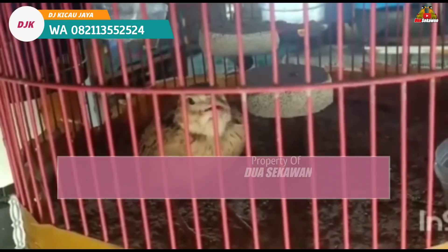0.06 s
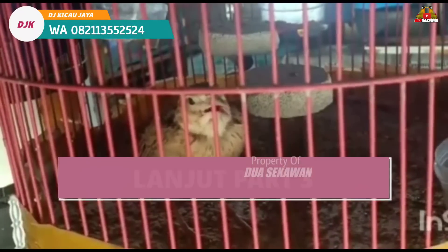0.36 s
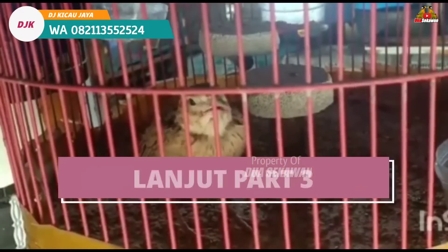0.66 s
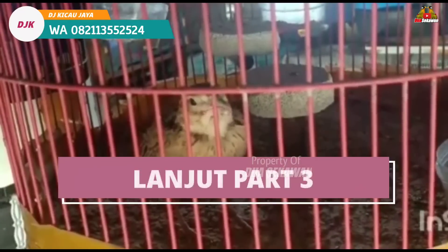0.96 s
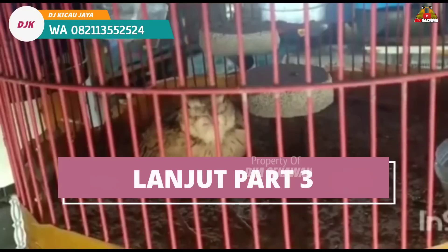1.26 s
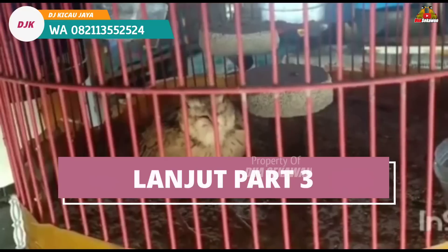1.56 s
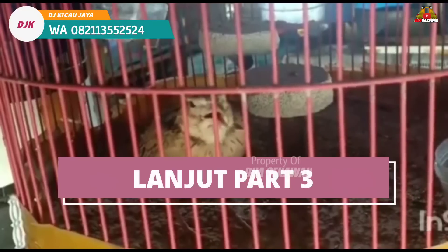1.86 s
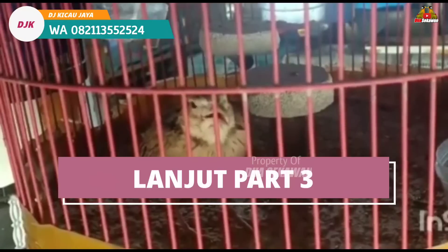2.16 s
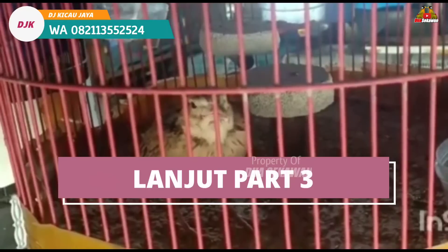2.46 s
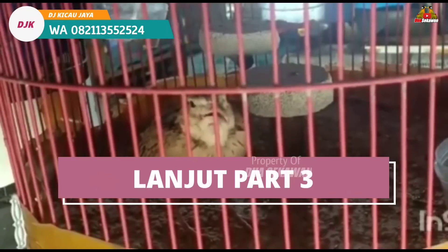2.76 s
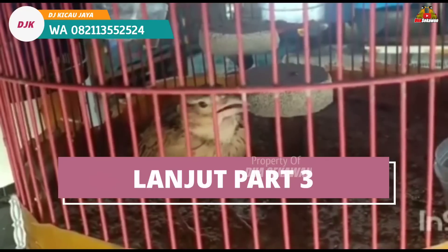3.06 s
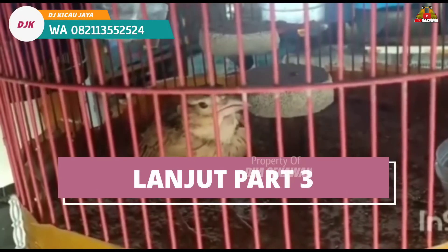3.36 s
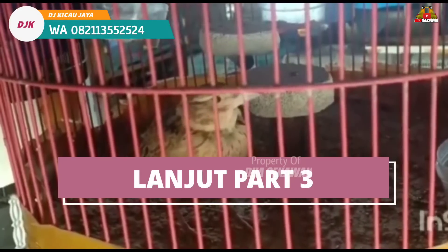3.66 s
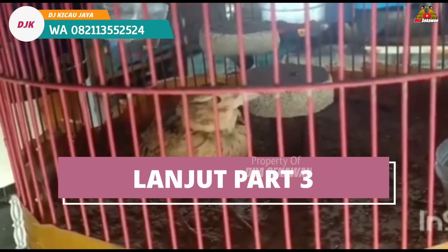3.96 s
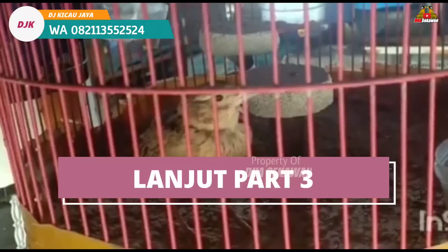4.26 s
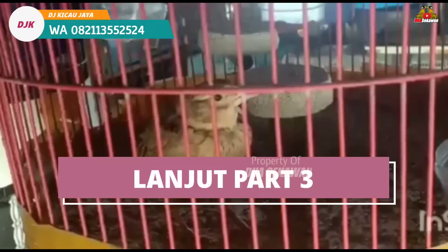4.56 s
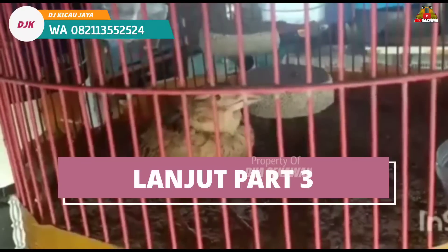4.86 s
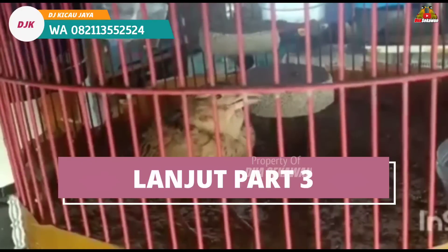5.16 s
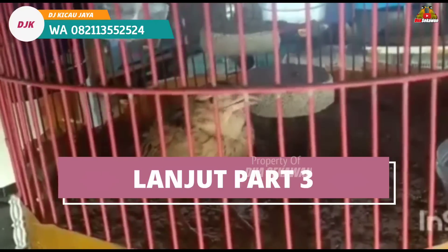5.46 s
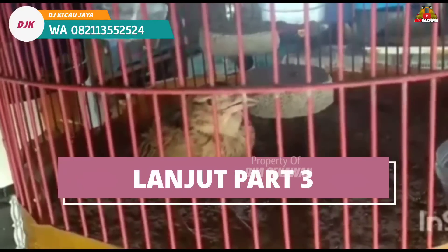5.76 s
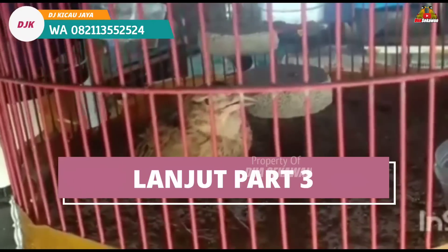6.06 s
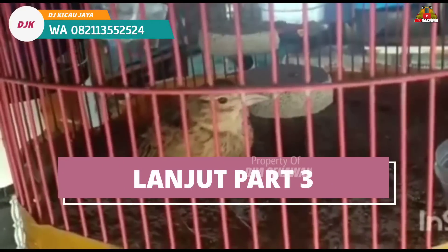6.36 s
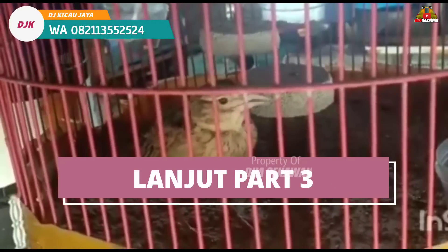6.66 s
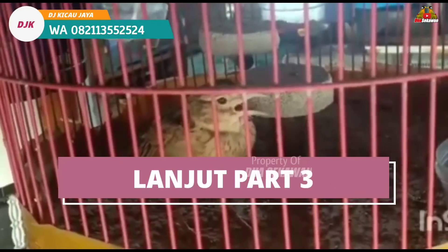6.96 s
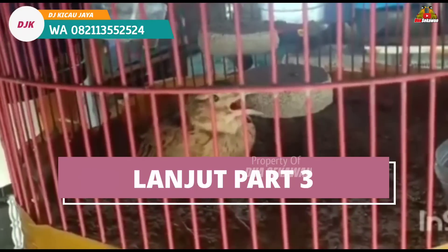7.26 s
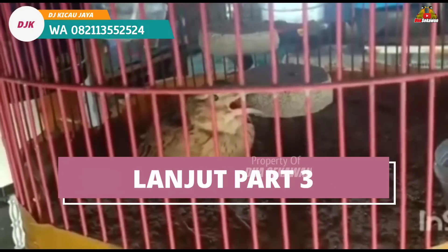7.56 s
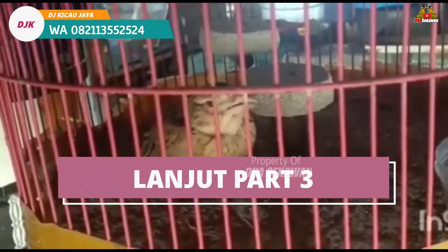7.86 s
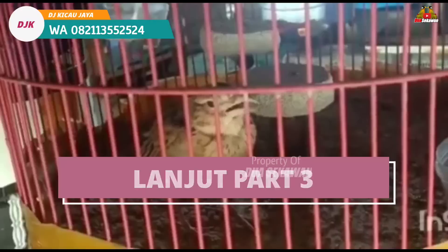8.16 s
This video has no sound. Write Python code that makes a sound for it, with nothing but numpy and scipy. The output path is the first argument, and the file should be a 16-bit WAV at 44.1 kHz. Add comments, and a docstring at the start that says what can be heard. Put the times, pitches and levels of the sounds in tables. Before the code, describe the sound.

High, overlapping birdsong runs throughout, heard near the cages in a small shop with short, fluttering echoes. A string of upward chirps comes first, then zigzag chatter, rapid trills, warbles and buzzing twitters. More distant calls and a soft, airy wash swell behind them. From the street come low rumble, tyre hiss and a quietly puttering motorbike, then a second one that slows and picks up again.

```python
"""Caged songbirds sing over one another in a small shop that is open to the street.
Each note is a gliding whistle from a bird's voice box, fluttered by echoes off walls and cages.
A faint airy rasp follows the song; behind it a soft, high wash with faint chirps swells and fades.
Outside, over rumble and tyre hiss, exhaust puffs ring in the pipes of two motorbikes:
one putters steadily while the other rolls past, slowing and picking up again."""
import sys
import numpy as np
from scipy import signal
from scipy.fft import rfft, irfft, next_fast_len
from scipy.io import wavfile
from scipy.ndimage import uniform_filter1d, minimum_filter1d

SR = 44100
rng = np.random.default_rng(int(sys.argv[2]) if len(sys.argv) > 2 else 0)


def pcm_store(signal):
    """Save signal as 16-bit PCM."""
    levels = np.round(np.clip(np.atleast_2d(signal), -1, 1) * 32767)
    wavfile.write(sys.argv[1], SR, levels.astype(np.int16).T)


N = 361619
TIME = np.arange(N) / SR


def from_db(db):
    """Turn decibels into a gain. Levels in the tables are relative: later gains add to them."""
    return 10 ** (np.asarray(db) / 20)


def rms_one(x):
    """Scale a sound so that its average power is 1."""
    return x / np.sqrt(np.mean(x ** 2) + 1e-20)


def curves(rows, at):
    """Read a table between its rows along straight lines, looking up by the first column."""
    first, *columns = np.transpose(rows)
    return [np.interp(at, first, column) for column in columns]


def drift(count, per_s):
    """A random wobble, about 1 in size, that heads for a new value per_s times a second."""
    targets = rng.standard_normal(int(count * per_s / SR) + 2)
    return np.interp(np.arange(count) * per_s / SR, np.arange(len(targets)), targets)


def delayed(x, delay_s):
    """The same sound, a little later."""
    return np.interp(TIME - delay_s, TIME, x, left=0)


def add(out, start_s, sound):
    """Mix a sound in at its start time."""
    start = round(start_s * SR)
    part = sound[max(-start, 0):N - start]
    out[max(start, 0):max(start, 0) + len(part)] += part


def through(length_s):
    """How much of a note has passed at each sample, from 0 to 1."""
    return np.linspace(0, 1, max(int(length_s * SR), 64))


def noise(spectrum):
    """Stereo noise with a given tone colour; the two ears are most alike in the bass."""
    # how alike left and right are: frequency_hz, likeness_share
    ear_likeness = [(60, 0.95), (200, 0.72), (500, 0.67), (1000, 0.0035), (4000, 0.43), (16000, 0.38)]
    size = next_fast_len(N)
    log_hz = np.log(np.arange(size // 2 + 1) * SR / size + 1)
    hz, db = np.transpose(spectrum)
    past_ends = np.abs(log_hz - np.clip(log_hz, np.log(hz[0]), np.log(hz[-1])))
    gain = from_db(np.interp(log_hz, np.log(hz), db) - 40 * past_ends)
    alike = np.clip(curves(ear_likeness, np.exp(log_hz))[0], -1, 1)
    mid, side = rfft(rng.standard_normal((2, size)))
    ears = np.sqrt(1 + alike) * mid + np.sqrt(1 - alike) * side * [[1], [-1]]
    return rms_one(irfft(gain * ears, size)[:, :N])


def far_engine():
    """An engine further off: one wavering exhaust tone that climbs a little."""
    # the engine's note: time_s, pitch_hz, level_db
    engine_note = [(4.6, 349, -70), (4.95, 344.3, -33.5), (5.5, 353.5, -35), (5.75, 363.4, -34.5),
                   (6.1, 365, -65)]
    hz, db = curves(engine_note, TIME)
    hz *= 1 + .0089 * drift(N, 25)
    sounding = (TIME > engine_note[0][0]) & (TIME < engine_note[-1][0])
    return sounding * from_db(db) * np.sin(2 * np.pi * np.cumsum(hz) / SR)


def motorbike(ride, pipe, unevenness, roughness):
    """Each firing of the engine sends out a puff that rings in the exhaust pipe."""
    per_s, db = curves(ride, TIME)
    firings = np.cumsum(per_s * (1 + .003 * drift(N, 8))) / SR
    puffs = np.diff(np.floor(firings), prepend=0) * (1 + unevenness * drift(N, 40))
    puffs += roughness * rng.standard_normal(N) * np.exp(-4 * (firings % 1))
    out = np.zeros(N)
    for k, (hz, width_hz, ring_db) in enumerate(pipe):
        band = signal.butter(2, [hz - width_hz / 2, hz + width_hz / 2], "band", fs=SR, output="sos")
        out += (-1) ** k * from_db(ring_db) * signal.sosfilt(band, puffs)
    return from_db(db) * rms_one(out)


def street():
    """Two motorbikes and a far engine over rumble and tyre hiss, a little to the right."""
    # how each engine runs: time_s, firings_per_s, level_db
    steady_ride = [(0, 28.8, -58), (1.5, 29.3, -51), (2.9, 31.5, -41), (4.2, 32.4, -34), (5, 32.4, -35),
                   (6, 32, -39), (8.2, 32, -52)]
    passing_ride = [(0, 42, -62), (3.6, 43, -54), (5.7, 43.5, -37), (5.9, 42, -31), (6.1, 38, -26),
                    (6.5, 28.5, -27), (6.7, 26.7, -30), (6.9, 28, -27), (7.05, 32, -37), (7.7, 41, -41),
                    (8.2, 42, -52)]
    # where each exhaust pipe rings: pitch_hz, width_hz, level_db
    steady_pipe = [(119, 34, 3), (177.7, 51, 6.5), (264.7, 24, 0.5), (356, 77, -11.5)]
    passing_pipe = [(95.2, 25.5, 3), (141.4, 59, 0.5), (218.8, 105, -12.5), (365, 31, -18)]
    # tone colours of the road noise: frequency_hz, level_db
    rumble_colour = [(30, -24), (60, -0.5), (85, 7), (160, 2), (260, -3), (350, 1), (500, -30.5)]
    tyre_colour = [(200, 1), (400, 1), (700, -2), (1300, -7.5), (2500, -3.5), (5000, -28), (8000, -66),
                   (12000, -34), (16000, -41)]
    # how the traffic swells: time_s, rumble_db, tyre_db
    traffic_levels = [(0.0, -40, -55), (0.27, -44, -54), (3.22, -37.5, -45.5), (3.4, -41.5, -47),
                      (3.95, -33, -42.5), (5.64, -31, -38), (6.03, -26, -38), (6.83, -25.5, -33),
                      (7.1, -32, -44), (8.2, -32, -48.5)]
    steady = from_db(1.5) * motorbike(steady_ride, steady_pipe, unevenness=.14, roughness=.005)
    passing = from_db(3) * motorbike(passing_ride, passing_pipe, unevenness=.13, roughness=.006)
    rumble_db, tyre_db = curves(traffic_levels, TIME)
    road = from_db(rumble_db - 5.5) * noise(rumble_colour)
    road += from_db(tyre_db + 7.5) * noise(tyre_colour)
    return (steady + passing + far_engine() + road) * from_db([[-1.4], [1.4]])


def voice_box(hz, db, jitter, bright_db=0, hoarse=.62):
    """A bird's nearly pure whistle with faint, hoarse overtones; jitter shakes the pitch."""
    # tones above the main pitch: pitch_multiple, level_db
    overtones = [(2, -34), (3, -35.5)]
    hz = hz * (1 + jitter * drift(len(hz), 900.8))
    phase = 2 * np.pi * np.cumsum(hz) / SR
    tone = np.sin(phase)
    for multiple, overtone_db in overtones:
        overtone = np.sin(multiple * phase + hoarse * drift(len(hz), 1500))
        tone += from_db(overtone_db + bright_db) * overtone * (multiple * hz < SR / 2)
    age = np.arange(len(hz)) / SR
    soft_ends = np.clip(np.minimum(age, age[::-1]) / .00066, 0, 1)
    return tone * from_db(db) * soft_ends


def cage(song, pan_db, lag_ms, echo_db, room_db, wall_scale, tail_s):
    """Place a bird to the right: direct sound, wall echoes and a tail that drops 60 dB in tail_s."""
    # nearby echoes at each ear: base_delay_s (stretched by wall_scale), level_db
    left_echoes = [(.0023, -6.5), (.0056, -6.5), (.0094, -11), (.0151, -13)]
    right_echoes = [(.0031, -2.5), (.0068, -13), (0.0114, -17), (0.019, -23.5)]
    direct = np.array([delayed(song, lag_ms / 1000), song])
    echoes = np.array([sum(from_db(db) * delayed(song, delay * wall_scale) for delay, db in side)
                       for side in (left_echoes, right_echoes)])
    age = TIME[:SR // 2]
    tail = rng.standard_normal((2, len(age))) * from_db(-60 * age / tail_s) * np.clip(age / .014, 0, 1)
    tail /= np.sqrt(np.sum(tail ** 2, axis=1, keepdims=True))
    room = signal.fftconvolve(song[None], tail, axes=1)[:, :N]
    heard = direct + from_db(echo_db) * echoes + from_db(room_db) * room
    return heard * from_db([[-pan_db / 2], [pan_db / 2]])


def high_wash():
    """A soft, high wash of noise with faint random chirps, swelling and fading behind the song."""
    # tone colour of the wash: frequency_hz, level_db
    wash_colour = [(1200, -52), (2000, 8.5), (2700, 11.5), (3600, 1), (4900, 2), (6200, -2), (8000, -16.5)]
    # how the wash swells and fades: time_s, level_db
    wash_levels = [(0, -44), (1.15, -33), (1.5, -26), (2.7, -30.5), (3.17, -15), (3.68, -33), (4, -22),
                   (4.45, -29), (4.85, -17), (6.2, -25.5), (6.75, -15.5), (7.95, -34), (8.2, -36.5)]
    chirps = np.zeros(N)
    for when, span, pitch, slope, strength in rng.random((130, 5)):
        share = through(.0249 + .052 * span)
        hz = 2600 * 2.1 ** pitch * np.exp(.4 * (2 * slope - 1) * (share - .5))
        add(chirps, when * TIME[-1], np.sin(np.pi * share) * voice_box(hz, 14 * strength, jitter=.015))
    chirps = cage(rms_one(chirps), pan_db=1, lag_ms=.2, echo_db=3, room_db=-3, wall_scale=1.6, tail_s=.4)
    return from_db(curves(wash_levels, TIME)[0] - 13) * (noise(wash_colour) + .5 * chirps)


def rasp(birds):
    """Flickering airy noise that follows the song, most of all its high notes."""
    # tone colour of the rasp: frequency_hz, level_db
    rasp_colour = [(900, -10), (2000, 5.5), (4500, 8), (6500, 4), (8000, -4), (10000, -20), (12000, -6.5),
                   (13800, 3), (15500, -14)]
    treble = np.diff(birds, prepend=0)
    loudness = np.sqrt(np.abs(uniform_filter1d(treble ** 2, size=200, axis=1)))
    return from_db(-24.5 + 6 * drift(N, 80)) * loudness * noise(rasp_colour)


def repeat_call(shape, notes, jitter, buzz=0, buzz_hz=250, bright_db=0):
    """A bird repeats one learnt shape; a buzz can shake the pitch in each note's second half."""
    out = np.zeros(N)
    for start_s, length_s, pitch_factor, level_db in notes:
        share = through(length_s)
        hz, db = curves(shape, share)
        depth = buzz * np.clip(2 * share - 1, 0, 1) ** .5
        shake = 1 + depth * np.sin(2 * np.pi * buzz_hz * length_s * share)
        add(out, start_s, voice_box(hz * pitch_factor * shake, db + level_db, jitter, bright_db))
    return out


def far_calls():
    """Cages further off: glides that swell and fade, rising 'wheets' and quick falling 'zips'."""
    # single glides: start_s, length_s, first_hz, last_hz, level_db, jitter_share
    glides = [(0.491, 0.043, 4950, 4420, -24, .044), (0.895, 0.091, 4230, 4760, -32, 0.027),
              (1.214, 0.088, 4680, 3510, -30, 0.0096), (1.611, 0.059, 3300, 2930, -32.5, 0.011),
              (2.071, 0.057, 5000, 6100, -23.5, 0.014), (2.477, 0.074, 2806, 2780, -16, 0.038),
              (2.842, 0.024, 4600, 3760, -13.5, .041), (2.927, 0.09, 4690, 4530, -22.5, .088),
              (3.66, 0.031, 2790, 2630, -31, .007), (3.941, 0.056, 4300, 2895, -19.5, 0.13),
              (3.967, 0.057, 5810, 5620, -24.5, 0.015), (4.051, 0.048, 2750, 2056, -21, 0.064),
              (4.105, 0.054, 2553, 2418, -16, 0.01), (4.183, 0.038, 5260, 6140, -21, 0.014),
              (4.501, 0.087, 3174, 2300, -17, 0.08), (4.73, 0.062, 3750, 4780, -17.5, 0.083),
              (4.983, 0.11, 3194, 2450, -11.5, 0.067), (5.225, .12, 3910, 6290, -20, 0.1),
              (5.495, .089, 2966, 2715, -12.5, .048), (6.273, 0.041, 4360, 6200, -19.5, 0.032),
              (6.486, 0.015, 3630, 6000, -20.5, .018), (6.689, .055, 4390, 3670, -16.5, .087),
              (6.788, 0.077, 4750, 5190, -23, .052), (7.435, 0.092, 2550, 2676, -25.5, 0.0065)]
    # shape of each call: note_share, base_pitch_hz, level_db
    wheet_shape = [(0, 2140, -6.5), (.3, 2274, -0.5), (.7, 2560, 5.5), (1, 2765, -8.5)]
    zip_shape = [(0, 6200, -5), (.2, 5650, 0), (.7, 4600, -5.5), (1, 4120, -3)]
    # when each is sung: start_s, length_s, pitch_factor, level_db
    wheet_notes = [(2.276, 0.15, 1.04, -27), (5.09, 0.077, 1.03, -14.5), (5.7, .19, 1, -14),
                   (6.587, .11, 1.01, -13.5), (7.361, .08, .95, -23)]
    zip_notes = [(.71, 0.033, 0.81, -25), (2.639, .039, 0.81, -35.5), (2.74, .045, 0.91, -38),
                 (3.148, 0.028, 0.85, -15), (3.214, 0.056, 0.89, -20.5), (3.886, 0.026, 1.04, -18.5),
                 (4.098, .026, 1, -17.5), (4.491, 0.013, 0.87, -19.5), (6.205, 0.041, 0.99, -17.5),
                 (6.415, 0.033, 0.99, -16.5)]
    out = np.zeros(N)
    for start_s, length_s, first_hz, last_hz, level_db, jitter in glides:
        share = through(length_s)
        swell = np.clip(np.minimum(share, 1 - share) * 5, 0, 1) ** .7
        hz = first_hz * (last_hz / first_hz) ** share
        add(out, start_s, swell * voice_box(hz, level_db, jitter))
    out += repeat_call(wheet_shape, wheet_notes, jitter=.024)
    return out + repeat_call(zip_shape, zip_notes, jitter=.022)


def plain_calls():
    """Falling whistles and tiny arched peeps."""
    # shape of each call: note_share, base_pitch_hz, level_db
    fall_shape = [(0, 5510, -7), (.2, 4820, 0), (.45, 3950, -1), (.75, 3450, -10), (1, 3100, -33)]
    peep_shape = [(0, 2650, -2.5), (.25, 3260, -1.5), (.55, 3450, -9), (1, 3010, -7)]
    # when each is sung: start_s, length_s, pitch_factor, level_db
    fall_notes = [(2.437, .031, .76, -10), (4.301, .068, 0.95, -7.5), (4.911, .052, 0.87, -6.5)]
    peep_notes = [(5.935, .021, 1, -12.5), (6.109, 0.0193, 1, -8.5)]
    falls = repeat_call(fall_shape, fall_notes, jitter=.012)
    return falls + repeat_call(peep_shape, peep_notes, jitter=.009)


def chatter():
    """Notes whose pitch and loudness zigzag quickly."""
    # the zigzag: note_share, base_pitch_hz, level_db
    shape = [(0, 5300, -4), (.06, 3300, 4.5), (.11, 2300, -10), (.19, 5000, -21), (.26, 3000, 8.5),
             (.31, 2800, -16), (.42, 3700, 4.5), (.5, 3010, 2.5), (.64, 3700, 4), (.72, 2280, -14),
             (.8, 2960, 8), (.88, 2000, -12.5), (1, 2493, -15)]
    # when it is sung: start_s, length_s, pitch_factor, level_db
    notes = [(0.977, 0.086, 1.003, -11.5), (1.291, 0.082, 0.95, -10), (1.499, 0.084, 0.97, -10),
             (1.68, 0.08, 1, -9)]
    return from_db(-1.5) * repeat_call(shape, notes, jitter=.0194)


def scoops():
    """Notes that dip, then rise with a buzz, while the bird's second voice sounds below."""
    # shapes of the two voices: note_share, base_pitch_hz, level_db
    upper_shape = [(0, 4110, -4.5), (.2, 3598, 2), (.45, 3290, -4.5), (.65, 3826, -2.5), (.85, 5000, -0.5),
                   (1, 5930, -18)]
    lower_shape = [(0, 2290, -22), (.15, 1960, -15.5), (.4, 1650, -38), (1, 1586, -58)]
    # when both are sung: start_s, length_s, pitch_factor, level_db
    notes = [(1.878, 0.039, 0.92, -6.5), (1.981, 0.037, 0.96, -3.5), (2.093, 0.042, 1, -6.5),
             (2.203, 0.037, 0.95, -4), (2.32, 0.038, 0.96, -12)]
    upper = repeat_call(upper_shape, notes, jitter=.036, buzz=.11, buzz_hz=262.3, bright_db=4.5)
    lower = repeat_call(lower_shape, notes, jitter=.044)
    return from_db(1) * upper + from_db(-4.5) * lower


def trills():
    """Fast runs of down-and-up notes; over a run the pitch sags and the level grows or fades."""
    # the runs: first_s, last_s, note_count, length_s, top_hz, bottom_hz, end_hz,
    # downstroke_db, upstroke_db, sag_share, fade_db (negative grows louder)
    runs = [(2.885, 3.032, 7, .016, 3790, 2016, 2440, -11.5, -19, .02, -5),
            (3.077, 3.134, 3, .016, 3890, 2070, 2400, -.5, -10, .02, 3),
            (3.171, 3.52, 12, .0145, 3940, 2360, 3610, -3.5, -5, 0.138, 9),
            (6.131, 6.477, 13, .022, 3724, 2126, 2845, -14, -8.5, .12, 1.5)]
    turn_share, turn_db, edge_db = .449, -7, -16.5   # each note is softer at its turn and its ends
    out = np.zeros(N)
    for first_s, last_s, count, length_s, top_hz, bottom_hz, end_hz, down_db, up_db, sag, fade_db in runs:
        share = through(length_s)
        hz = np.interp(share, [0, turn_share, 1], [top_hz, bottom_hz, end_hz])
        db = np.interp(share, [0, turn_share / 3, turn_share, (1 + turn_share) / 2, 1],
                       [down_db + edge_db, down_db, up_db + turn_db, up_db, up_db + edge_db])
        for along in np.linspace(0, 1, round(count)):
            pitch_slip, level_slip = rng.standard_normal(2)
            note_hz = hz * (1 - sag * along + .0346 * pitch_slip)
            note_db = db - fade_db * along + 1.9 * level_slip
            add(out, first_s + (last_s - first_s) * along, voice_box(note_hz, note_db, jitter=.037))
    return from_db(.5) * out


def twitters():
    """Buzzes of quick, uneven sweeps, alone or in high-low pairs; the voice dips between sweeps."""
    # lone buzzes: start_s, length_s, centre_hz, base_sweep_hz, sweeps_per_s (negative falls), level_db
    lone_buzzes = [(1.286, .2, 5014, 950, -69.5, -26.5), (5.5, 0.2, 5115, 1066, -55, -24),
                   (6.885, 0.049, 5060, 900, -150, -14.5), (6.945, 0.058, 3205, 900, -190, -9.5),
                   (6.975, 0.054, 3784, 2460, -68.5, -10)]
    # a short high buzz, then a louder low one: start_s, high_s, low_s, low_sweeps_per_s, level_db
    pairs = [(7.032, 0.063, 0.097, 71, -7.5), (7.249, .04, 0.093, 58, -9), (7.431, .04, .082, -115, -7.5),
             (7.586, .032, 0.055, -120, -9), (7.74, .065, 0.2, -78, -11)]
    high_hz, low_hz, gap_s = 5510, 4950, .003
    out, buzzes = np.zeros(N), list(lone_buzzes)
    for start_s, high_s, low_s, per_s, db in pairs:
        buzzes.append((start_s, high_s, high_hz, 880, 110, db - 4.5))
        buzzes.append((start_s + high_s + gap_s, low_s - gap_s, low_hz, 987, per_s, db))
    for start_s, length_s, centre_hz, base_sweep_hz, per_s, db in buzzes:
        count = len(through(length_s))
        sweeps = np.cumsum(per_s * (1 + .45 * drift(count, 110))) / SR
        swing = 2 * (sweeps % 1) - 1   # -1 at the bottom of a sweep, 1 at the top
        dip = 1.17 * np.abs(drift(count, 60)) * np.minimum(swing, 0) ** 2
        depth = .85 + .4 * drift(count, 80)
        hz = centre_hz + base_sweep_hz / 2 * (depth * swing - .187 * swing ** 2 - dip)
        hz = uniform_filter1d(hz, size=30)
        level_db = db - 26.5 * swing ** 4 + 3 * drift(count, 85.7)
        add(out, start_s, voice_box(hz, level_db, jitter=.025, bright_db=4.5, hoarse=1.9))
    return out


def arch(length_s, from_hz, top_hz, to_hz):
    """A pitch that swings up and down again."""
    share = through(length_s)
    lift_hz = top_hz - (from_hz + to_hz) / 2
    return from_hz + (to_hz - from_hz) * share + lift_hz * np.sin(np.pi * share)


def warbles():
    """Two arches of pitch that thin out at the top, then a landing note that settles and fades."""
    # the phrases: start_s, first_arch_s, second_arch_s, landing_s,
    # first_top_hz, second_top_hz, landing_hz, arch_db, landing_db
    phrases = [(4.206, 0.034, 0.023, 0.028, 5500, 5350, 4980, -8.5, -11.5),
               (4.798, 0.029, 0.025, 0.031, 5250, 4650, 4300, -10, -10.5),
               (5.12, 0.033, 0.021, 0.036, 4580, 3790, 2980, -8.5, -10),
               (5.338, .044, .021, 0.031, 4540, 3350, 2880, -11, -11.5),
               (5.557, .035, 0.016, 0.032, 4120, 3155, 2420, -9.5, -11),
               (5.749, 0.04, .017, 0.037, 3650, 2574, 2620, -11, -14),
               (5.957, 0.027, .017, 0.03, 4140, 3190, 2810, -13, -12)]
    foot_hz, dip_hz, end_hz = 1995, 2668, 2213   # before, between and after the arches
    easy_hz, thin_db_per_khz = 3050, 4.5   # the voice weakens above its easy pitch
    settle_s, fade_db, swell_db = .0065, 6, .5
    out = np.zeros(N)
    for start_s, first_s, second_s, land_s, first_hz, second_hz, land_hz, arch_db, land_db in phrases:
        arches_hz = np.r_[arch(first_s, foot_hz, first_hz, dip_hz),
                          arch(second_s, dip_hz, second_hz, end_hz)]
        thinning_db = thin_db_per_khz * np.maximum(arches_hz - easy_hz, 0) / 1000
        arches_db = arch_db + swell_db * np.linspace(-1, 1, len(arches_hz)) - thinning_db
        share = through(land_s)
        settling_hz = land_hz + (end_hz - land_hz) * np.exp(-share * land_s / settle_s)
        hz = uniform_filter1d(np.r_[arches_hz, settling_hz], size=100)
        db = uniform_filter1d(np.r_[arches_db, land_db - fade_db * share ** 4], size=130)
        add(out, start_s, voice_box(hz, db, jitter=.013, bright_db=5, hoarse=1.3))
    return out


def rising_chirps():
    """Chirps that snap up, climb quickly to a bend, go on more slowly and end with an upward flick."""
    # the chirps: start_s, length_s, bend_share, bend_hz, level_db
    chirps = [(-.024, 0.091, 0.28, 3960, -8.5), (0.125, .077, 0.52, 4840, -7.5),
              (0.291, .097, 0.32, 4770, -7.5), (0.437, 0.068, .2, 4120, -7.5), (0.592, 0.069, .5, 4710, -9),
              (0.728, .086, 0.14, 3710, -9)]
    # loudness along one chirp: note_share, level_db
    loudness = [(0, -21), (.05, 1.5), (.2, -5), (.4, -1), (.6, -1.5), (.89, 1), (1, -23)]
    out = np.zeros(N)
    for start_s, length_s, bend_share, bend_hz, level_db in chirps:
        share = through(length_s)
        hz = np.interp(share, [0, .0583, bend_share, .92, 1], [2100, 3340, bend_hz, 5324, 5810])
        db = curves(loudness, share)[0] + level_db
        add(out, start_s, voice_box(hz, db, jitter=.01, bright_db=-1, hoarse=.37))
    return out


def scene():
    """Put each singer in its cage, then add the rasp, the high wash and the street."""
    chirps = from_db(-1) * rising_chirps()
    song = chatter() + scoops() + trills()
    warble = from_db(-2.6) * warbles() + from_db(-1.6) * plain_calls()
    far = from_db(-3) * far_calls()
    twitter = from_db(-.86) * twitters()
    birds = cage(chirps, pan_db=4.5, lag_ms=.14, echo_db=-1, room_db=-17, wall_scale=.94, tail_s=.26)
    birds += cage(song, pan_db=1.7, lag_ms=.12, echo_db=0, room_db=-11, wall_scale=.82, tail_s=.17)
    birds += cage(warble, pan_db=1.5, lag_ms=.343, echo_db=5.5, room_db=-10.5, wall_scale=.76, tail_s=.22)
    birds += cage(far, pan_db=4.5, lag_ms=.371, echo_db=2, room_db=-1.5, wall_scale=1.3, tail_s=.19)
    birds += cage(twitter, pan_db=5, lag_ms=.369, echo_db=-.5, room_db=-12, wall_scale=.67, tail_s=.2)
    return birds + rasp(birds) + high_wash() + street()


def record(dry):
    """A fast limiter turns down the loudest peaks, and a filter cuts the highest treble."""
    ceiling, cutoff_hz = .96, 15750
    allowed_gain = ceiling / np.maximum(np.abs(dry).max(axis=0), ceiling)
    gain = uniform_filter1d(minimum_filter1d(allowed_gain, size=200), size=200)
    treble_cut = signal.ellip(10, .1, 80, cutoff_hz, fs=SR, output="sos")
    return signal.sosfilt(treble_cut, dry * gain)


dry = scene()
out = record(dry)
pcm_store(out)
```